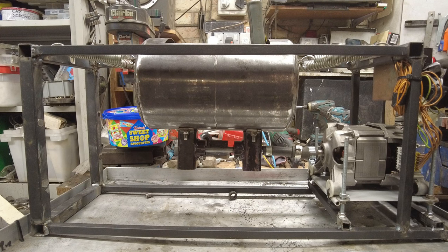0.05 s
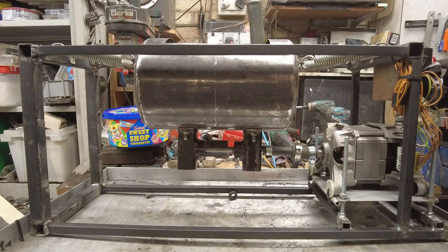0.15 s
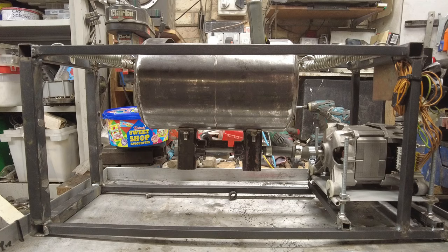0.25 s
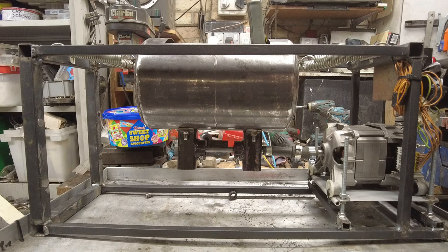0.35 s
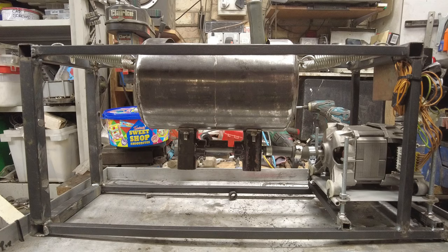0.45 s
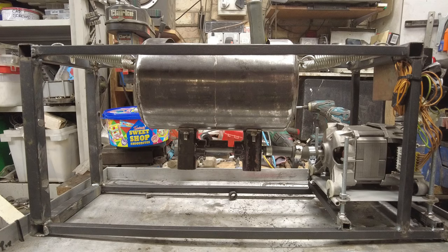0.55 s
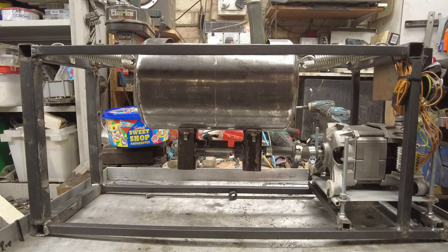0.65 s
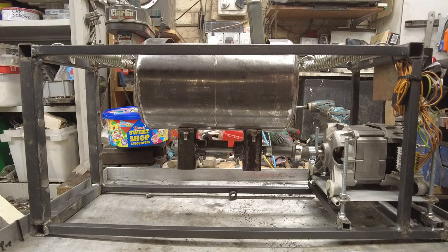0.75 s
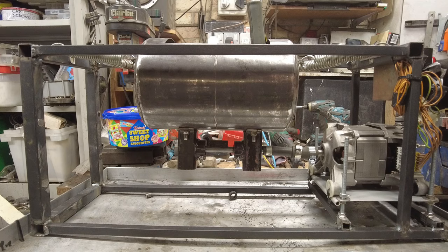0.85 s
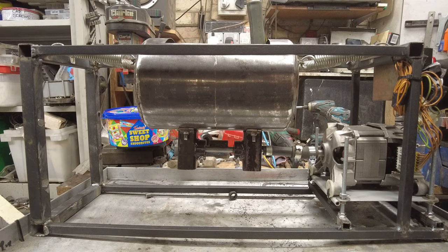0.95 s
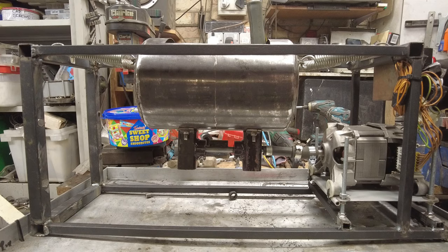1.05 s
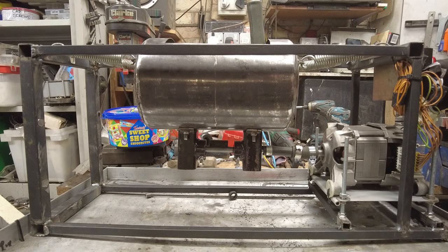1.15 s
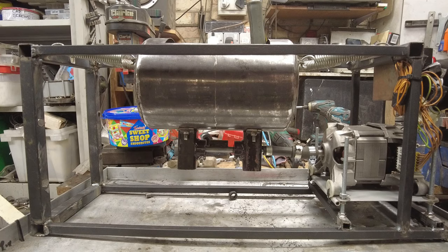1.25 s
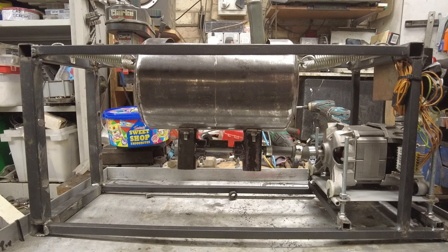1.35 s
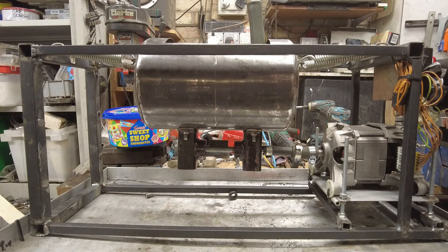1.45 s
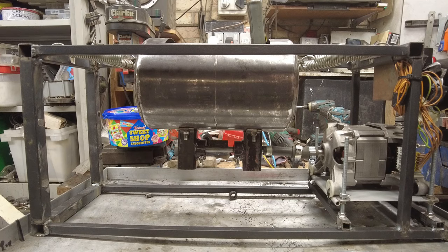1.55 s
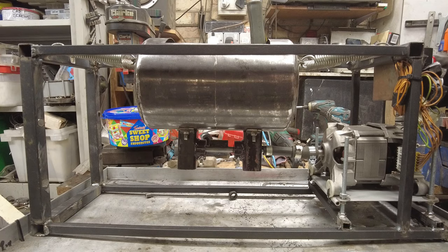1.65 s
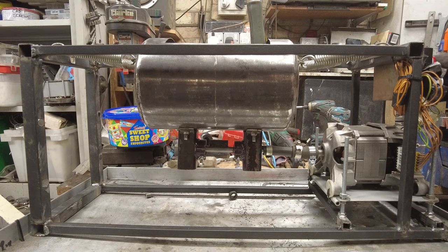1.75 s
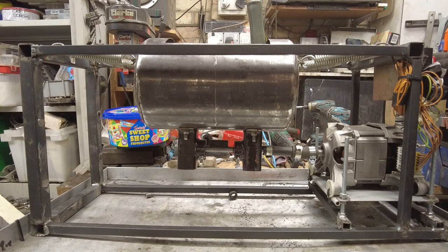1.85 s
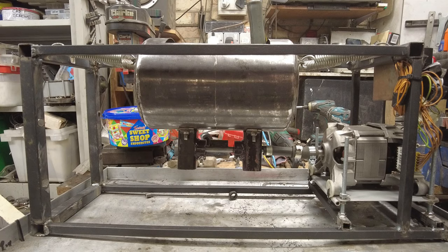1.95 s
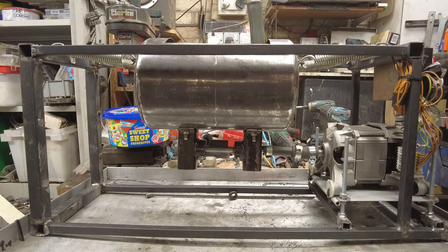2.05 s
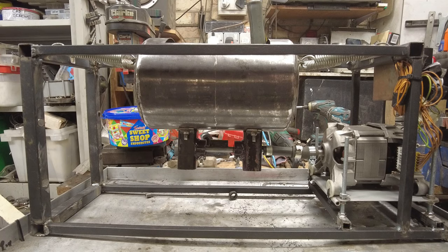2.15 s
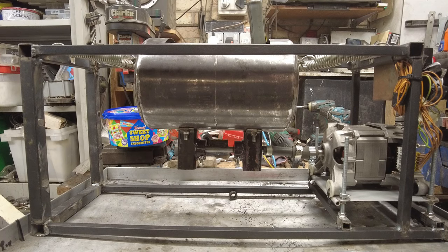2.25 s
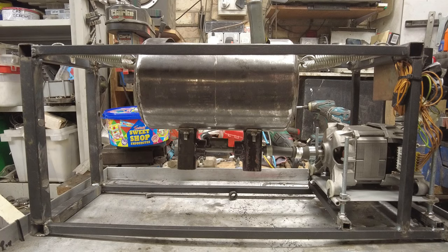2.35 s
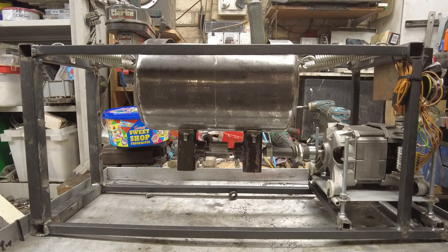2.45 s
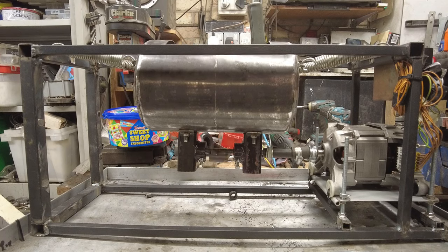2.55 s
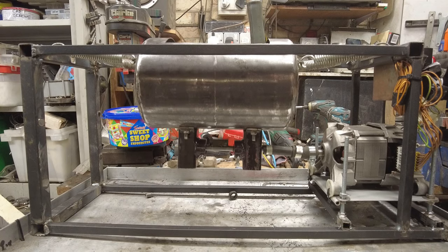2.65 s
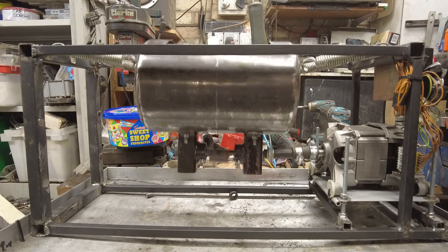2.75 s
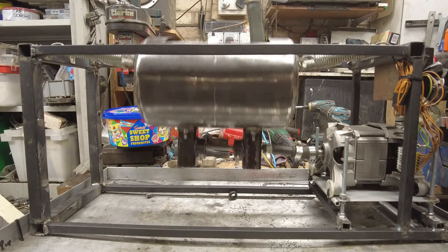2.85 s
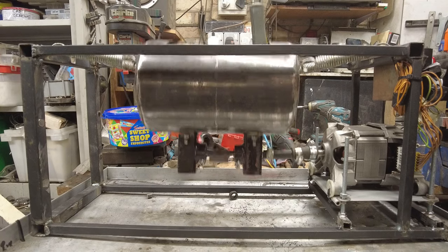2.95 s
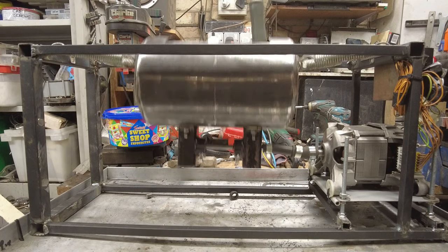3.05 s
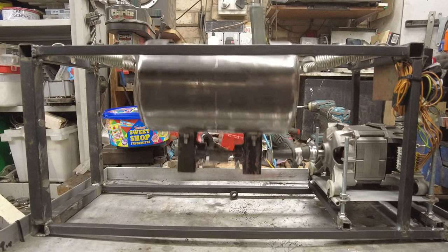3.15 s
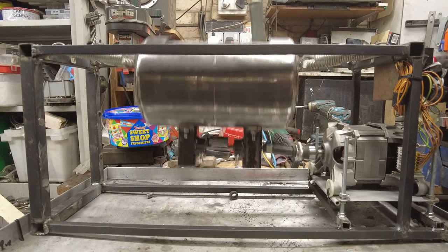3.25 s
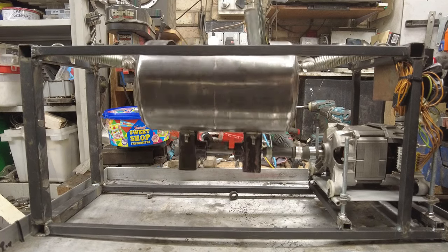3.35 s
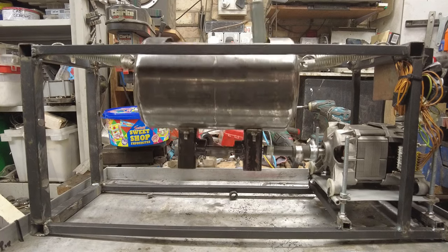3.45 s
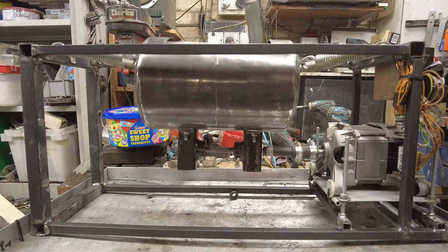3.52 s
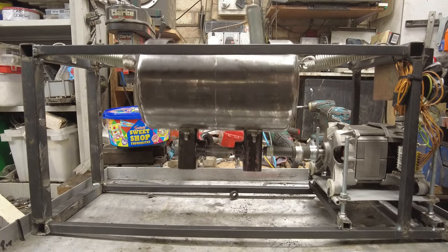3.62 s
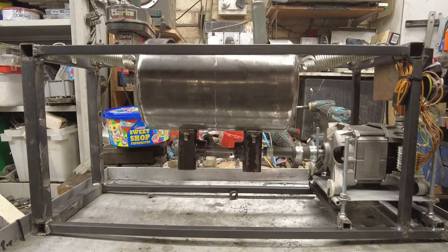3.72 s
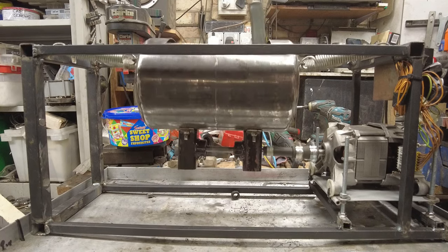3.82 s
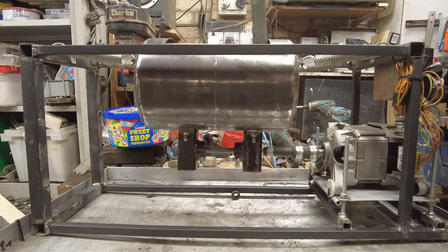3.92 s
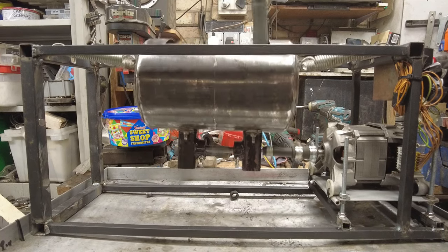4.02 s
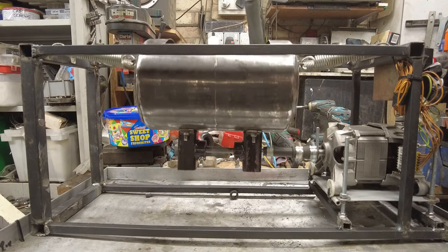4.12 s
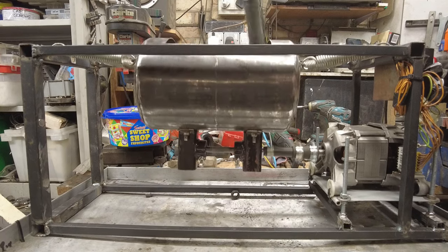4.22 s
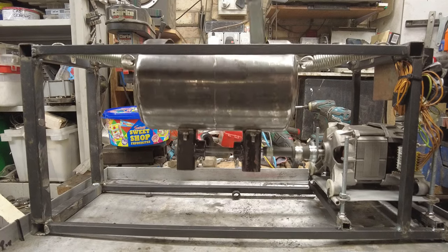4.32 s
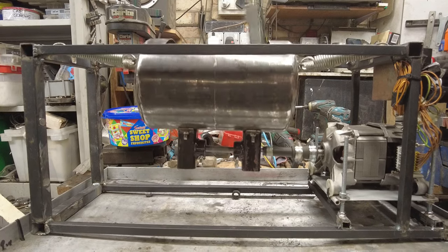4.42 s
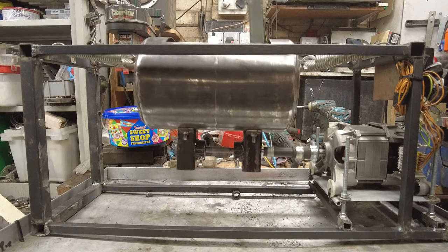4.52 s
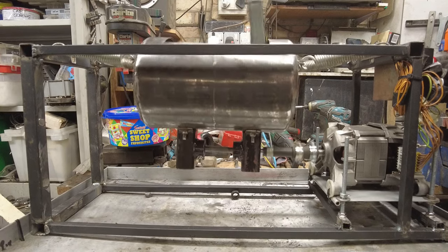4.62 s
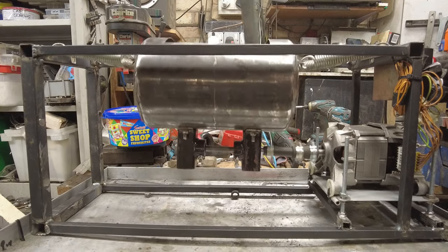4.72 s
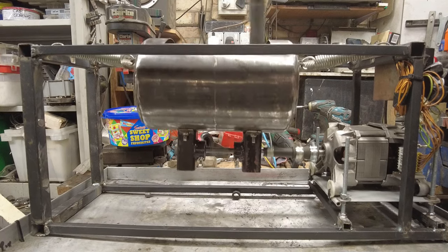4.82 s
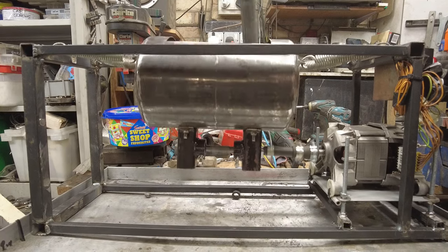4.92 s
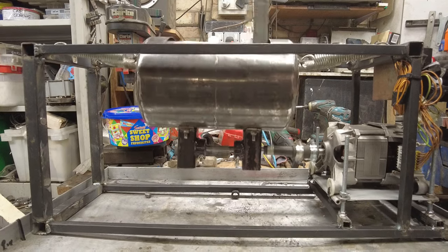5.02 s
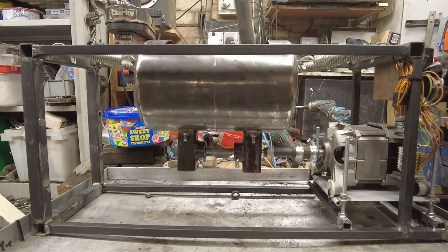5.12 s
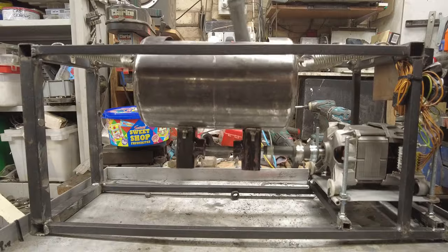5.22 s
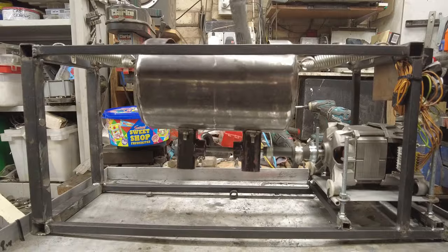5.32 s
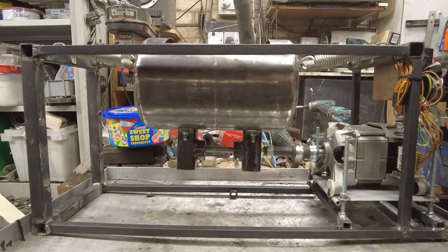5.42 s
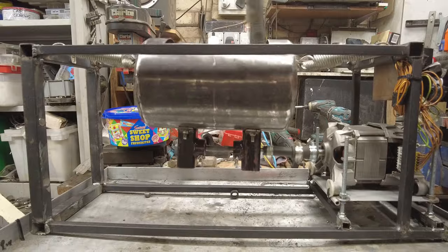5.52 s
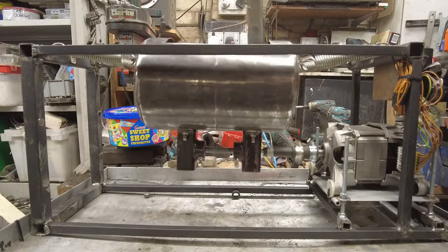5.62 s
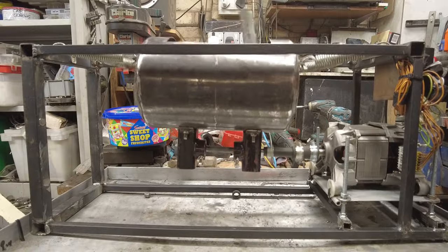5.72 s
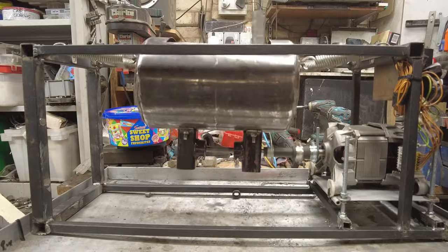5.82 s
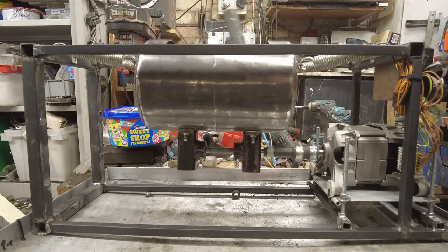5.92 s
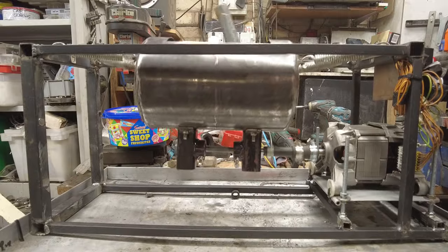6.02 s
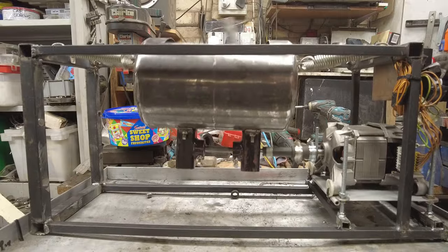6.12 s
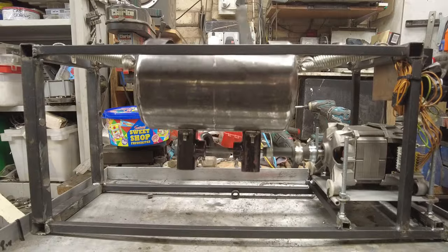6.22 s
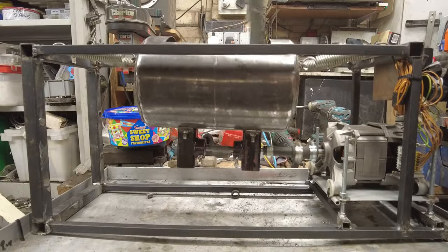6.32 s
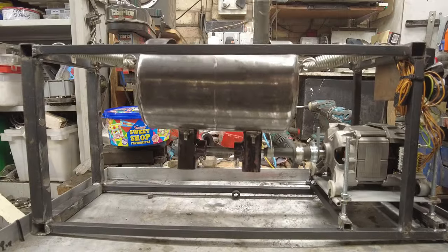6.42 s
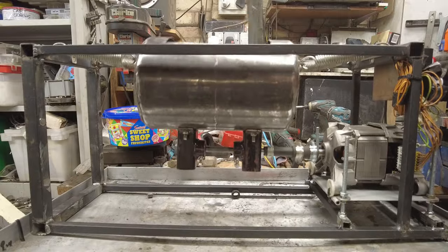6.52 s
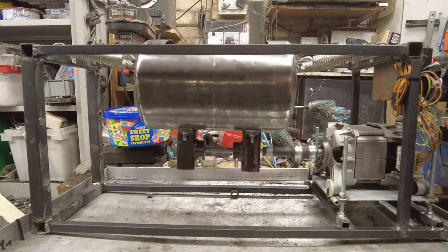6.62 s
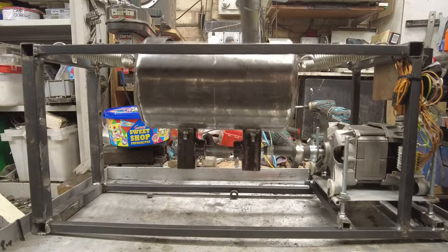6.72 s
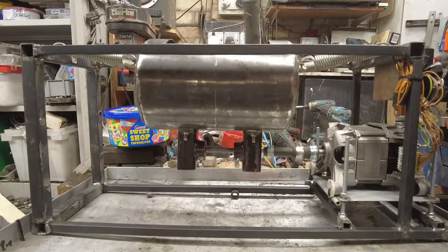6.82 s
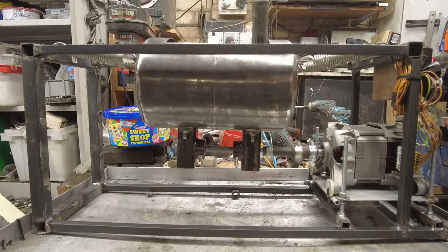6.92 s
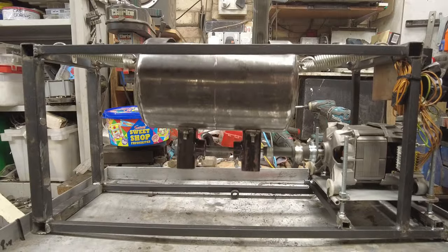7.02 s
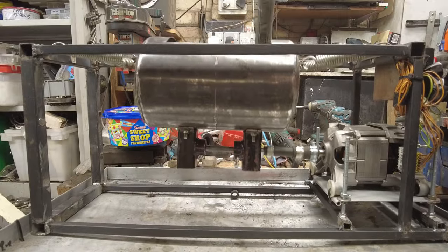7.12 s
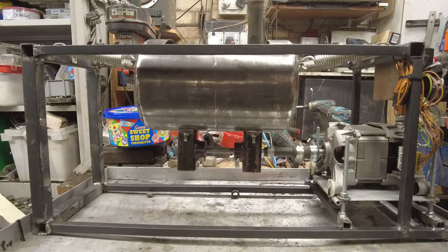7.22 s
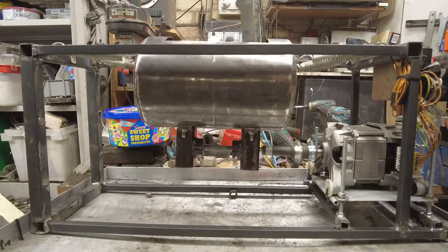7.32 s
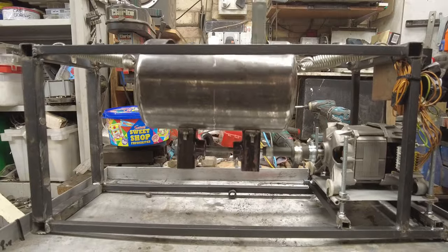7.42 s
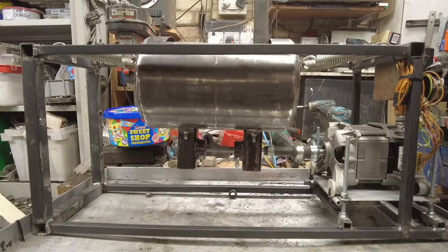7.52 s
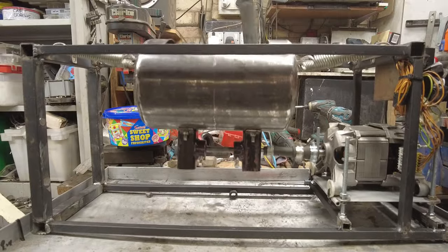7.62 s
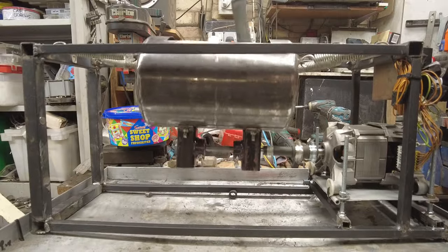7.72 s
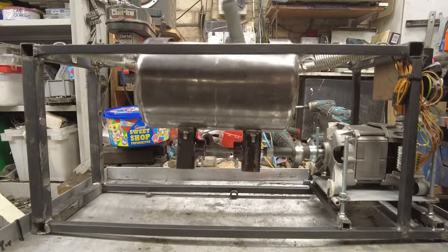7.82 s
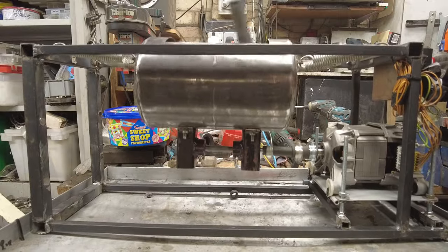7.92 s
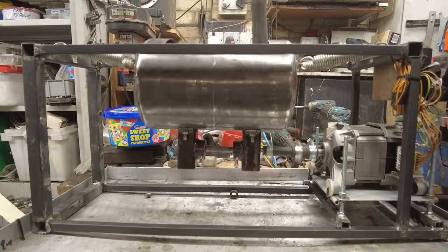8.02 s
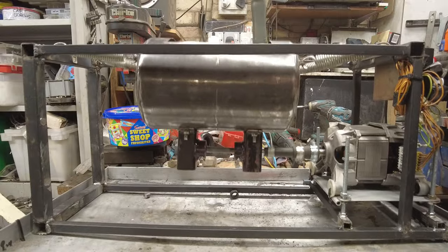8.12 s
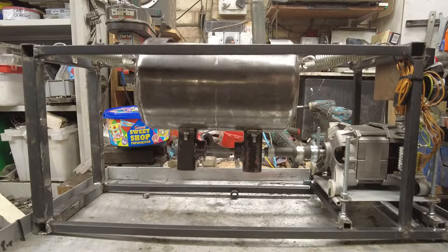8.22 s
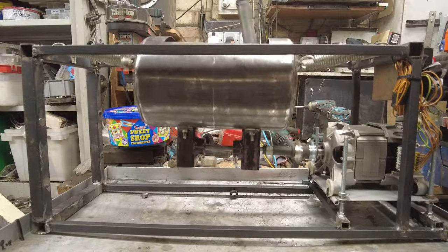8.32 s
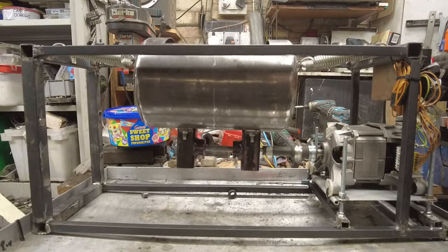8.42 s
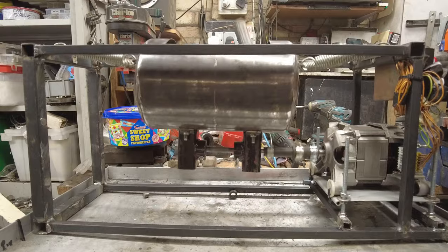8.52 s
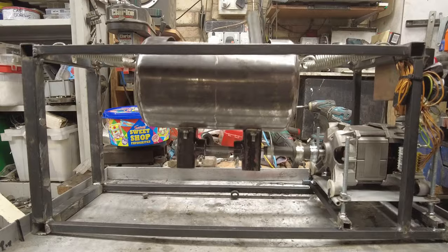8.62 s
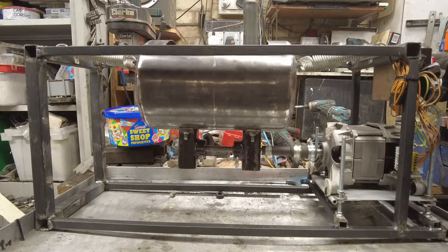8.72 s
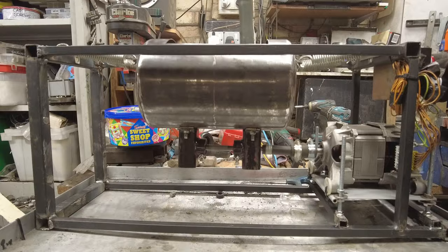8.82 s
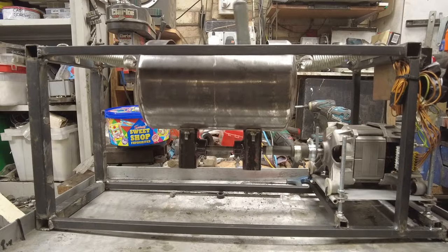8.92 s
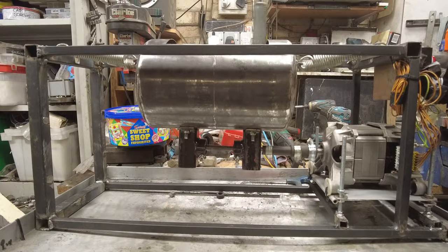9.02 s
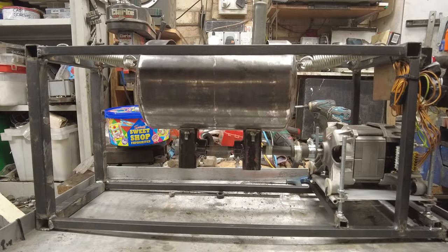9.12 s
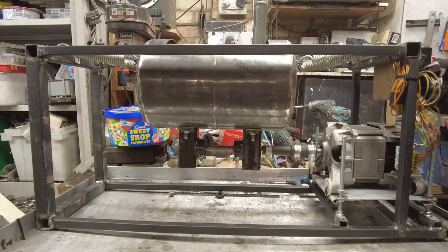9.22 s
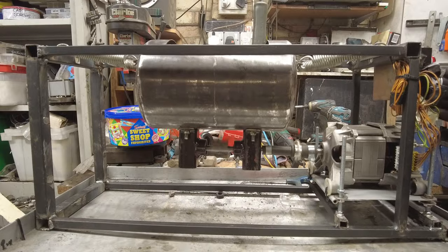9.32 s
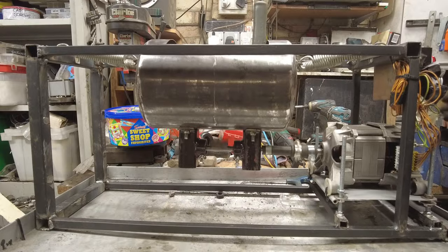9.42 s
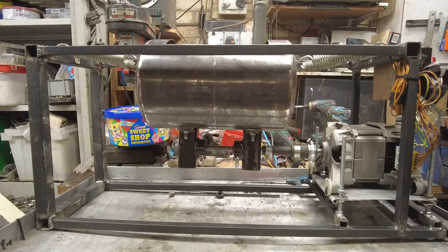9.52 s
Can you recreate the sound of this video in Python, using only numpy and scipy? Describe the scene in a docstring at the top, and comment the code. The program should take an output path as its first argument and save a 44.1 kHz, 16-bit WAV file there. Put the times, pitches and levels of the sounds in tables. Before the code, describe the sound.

A vibrating steel tumbler starts up in a garage. First only low room noise, a click and soft electrical humming; after more clacks the hum stops and heavy metal pieces slam the barrel wall. Rattling stays loud and irregular to the end, pulsing gently about five times a second, with hollow thumps, sharp clinks and a buried low drone. Heard close by in stereo, with short reflections.

```python
"""A vibratory tumbler starts in a garage: a switch clacks and mains-locked tones hum, buzz and whine.
Two more clacks follow as the sprung steel barrel begins to shake; the motor tones end at 2.81 s.
Bolts and hammers then pelt the wall and each other: random contacts ring steel modes, heaps crash,
chips shower in spurts that swell about five times a second, and thumps make the low modes boom.
From 3.8 s a drone (gliding sine) climbs; it drops away near 8.8 s. Noise rumbles beneath it all."""
import sys
import numpy as np
from scipy import signal
from scipy.fft import rfft, irfft
from scipy.io import wavfile
from scipy.ndimage import uniform_filter1d

SR = 44100
rng = np.random.default_rng(int(sys.argv[2]) if len(sys.argv) > 2 else 0)


def put_to_file(sound):
    """Save the sound as 16-bit audio at rate SR, in the file named by the first command-line argument."""
    columns = np.atleast_2d(sound).T  # one column per channel
    safe = np.clip(columns, -1, 1)
    whole_steps = np.round(safe * 32767)
    wavfile.write(sys.argv[1], SR, whole_steps.astype(np.int16))


N = 421596
TIME = np.arange(N) / SR
RING_TIME = TIME[:SR // 2]

# Levels are relative wherever a function normalizes or scales them.
# heaps crashing on the wall: start_s, wall_level_db, clink_level_db, pour_s
HEAP_CRASHES = [(2.606, -51, -83, .017), (2.786, -34, -60, 0.031), (2.834, -27, -55, 0.027),
                (3.04, -5, -32, .023), (3.236, -0.5, -23, 0.023), (3.27, -6.5, -30, 0.014),
                (3.298, -8.5, -35, .018), (3.42, -7.5, -29, 0.042), (3.469, -4, -26.5, 0.023),
                (3.54, -6.5, -34, 0.015), (3.617, -10.5, -40, 0.019), (3.731, -9, -28, 0.011),
                (3.817, -8.5, -30, 0.019), (3.985, -11.5, -41, 0.05), (4.06, -7.5, -36, 0.068),
                (4.27, -12.5, -44, 0.016), (4.378, -1.5, -27.5, 0.0094), (4.447, -7, -29.5, 0.03),
                (4.73, -12, -33.5, .018), (4.831, -7, -35, 0.024), (4.86, -23, -31, 0.0078),
                (5.104, -12, -32.5, 0.046), (5.354, -14.5, -32, 0.027), (5.416, -8, -27.5, 0.023),
                (5.565, -11, -35.5, 0.049), (5.613, -7, -29, 0.025), (5.818, -7.5, -32.5, 0.019),
                (5.895, -2.5, -32, 0.011), (5.953, -3, -40, 0.011), (6.05, -13.5, -30, 0.015),
                (6.201, -17, -47, 0.028), (6.352, -6.5, -31, 0.017), (6.529, -10, -28.5, 0.019),
                (6.602, -16, -29.5, 0.01), (6.679, -26, -31, 0.016), (6.925, -7, -37, 0.035),
                (7.412, -7.5, -33.5, .014), (7.571, -6, -28.5, 0.022), (7.695, -14, -32, 0.022),
                (7.805, -16, -45, 0.02), (7.911, -15, -31.5, .02), (7.966, -9, -37, 0.016),
                (8.314, -4.5, -35, 0.026), (8.359, -3.5, -26, 0.024), (8.549, -6, -30.5, 0.028),
                (8.948, -7, -29.5, 0.033), (9.04, -7, -33.5, 0.052), (9.161, -12.5, -31.5, 0.029),
                (9.333, -13, -36.5, 0.031)]
# drive of the load: time_s, wall_blow_level_db, clink_level_db, chip_level_db, boom_level_db
SHAKE_LEVELS = [(2.4, -74, -76, -82, -67), (2.58, -67, -78, -79, -60), (2.775, -56, -71, -70, -56),
                (2.85, -46.5, -85, -67, -32.5), (3.03, -38, -44, -61, -38.5), (3.22, -40, -64, -72, -39),
                (3.39, -28, -42, -62, -21), (3.48, -24.5, -41, -54, -31), (3.75, -21.5, -34, -47, -19),
                (4.05, -22, -32.5, -37, -17), (4.7, -21, -32, -39, -27), (5.45, -22.5, -33, -41, -20.5),
                (6.2, -22, -31.5, -41.5, -20.5), (6.8, -21, -33.5, -37.5, -20.5), (7.7, -21, -31, -38, -23),
                (8.8, -23.5, -35.5, -39.5, -21), (9.22, -26.5, -38, -56, -25), (9.56, -25, -34, -74, -21.5)]
# modes of the steel wall: pitch_hz, width_hz, level_db, left_right_phase_rad
WALL_MODES = [(749.4, 10, 1.5, 0.62), (796.3, 2.56, 5.5, 0.97), (934, 42, -14.5, 0.68), (932, 21, -4.5, 1),
              (981, 13, -2, 0.87), (987, 11.3, 3, 0.17), (1126, 11, -3, 1.16), (1193, 6, -4.5, 1.2),
              (1232, 48, -11, .2), (1284, 47, -15, .15), (1461, 7.8, -1.5, 0.18), (1525, 14.6, -3.5, 0.21),
              (1635, 7.3, -0.5, .3), (1702, 19, -17, .5), (1730, 8.4, -4, 0.36), (1796, 15.6, -6, 0.45),
              (1895, 45, -8, 0.33), (1960, 26, -17.5, 0.65), (2082, 10, -16, 0.49), (2354, 13, -9, .7),
              (2373, 15.5, -8.5, 0.35), (2554, 13, -13, 0.45), (2990, 41, -12.5, 0.45)]
# dense wall overtones: freq_hz, level_db
WALL_SPECTRUM = [(40, -16), (110, -22), (165, -4.5), (220, -2.5), (420, -7), (520, 1), (640, -2.5),
                 (1000, 2.5), (1350, 1), (1800, 5), (2100, -6), (2500, -3.5), (3500, -8.5), (7000, -33.5)]
# overtones of the loose parts: freq_hz, level_db
PARTS_SPECTRUM = [(1200, -13.5), (2500, 0.5), (3300, -2), (4300, 1), (5000, -3), (5700, -1), (6500, -4.5),
                  (7000, -12.5), (7800, -9), (8600, -14.5), (9500, -11.5), (11500, -18.5), (16000, -20)]
# handfuls of chips flung at the steel: start_s, level_db
CHIP_SHOWERS = [(2.78, -52), (3.383, -31.5), (4.11, -29), (5.85, -28.5), (7.335, -33), (7.695, -28)]
# chips on steel: freq_hz, level_db
CHIP_SPECTRUM = [(4000, -25), (7000, -1), (8000, -0.5), (11000, -6.5), (16000, -5.5)]
# lowest modes of the barrel: pitch_hz, width_hz, level_db
BOOM_MODES = [(287.25, 7.3, 2.5), (308.4, 22.4, 2), (334, 16.2, 0.5), (364.4, 7.9, -11), (396, 12, -13.5)]
# hammers thumping the barrel: peak_s, level_db
HAMMER_THUMPS = [(2.718, -44.5), (2.835, -27.5), (3.055, -8.5), (3.275, -10.5), (3.459, -11), (3.63, -17.5),
                 (4.035, -20), (4.13, -18), (4.2, -25), (4.43, -13), (4.56, -14.5), (4.63, -14.5),
                 (4.77, -14), (4.89, -14), (5.87, -15), (6.08, -17.5), (6.18, -15), (6.43, -17),
                 (7.221, -13), (7.378, -12), (7.529, -15.5), (7.709, -13.5), (7.851, -14), (7.965, -13.5),
                 (8.137, -16), (8.305, -16), (8.57, -14.5), (9.435, -15)]
# drone of the drive: time_s, pitch_hz
DRONE_PITCH = [(3.8, 40), (4.05, 50), (4.25, 63), (4.5, 79), (4.9, 83), (5.5, 83.5), (6.1, 83.5), (6.6, 83),
               (8.8, 81.5)]
# drone of the drive: time_s, level_db
DRONE_LEVEL = [(3.8, -54), (4.05, -33.5), (4.4, -41), (4.9, -37.5), (6.5, -37), (7.3, -35.5), (8.75, -35.5),
               (8.82, -59)]
# straining motor: time_s, hum_level_db, buzz_level_db, whine_level_db
MOTOR_LEVELS = [(1.12, -73, -78, -95), (1.17, -54, -73, -79), (1.48, -50.5, -70, -78),
                (1.56, -51.5, -71, -70.5), (2.2, -51, -71, -72), (2.33, -47.5, -67, -87),
                (2.43, -45, -87, -78), (2.74, -47, -65, -82), (2.81, -58, -81, -85)]
# hum of the iron: pitch_hz, level_db
HUM_LINES = [(100, 3), (150, -22), (200, -8.5), (300, -20), (400, -29)]
# buzz of the laminations: freq_hz, level_db
BUZZ_SPECTRUM = [(450, -10), (1100, -10.5), (1750, -4), (2100, -1), (2400, -3), (2600, -8), (3000, -5),
                 (3330, -2), (3800, -15), (6000, -17)]
# whine of the housing: pitch_hz, level_db
WHINE_LINES = [(1750, -7), (2100, -10), (2250, -8), (2300, 2), (2350, -17), (3350, -6)]
# switch and frame clacks: start_s, knock_level_db, knock_t60_s, mode_pitch_hz, mode_level_db, mode_width_hz
CLACK_EVENTS = [(1.131, -50, 0.34, 543, -57, 5.1), (2.355, -52.5, 0.36, 404, -54, 15),
                (2.609, -53.5, 0.16, 1380, -52, 25)]
# knock of a clack: freq_hz, level_db
CLACK_SPECTRUM = [(250, 0.5), (400, -6), (830, -10), (1200, -15), (2400, -22), (3300, -23), (5000, -32),
                  (15000, -40)]
# room rumble: freq_hz, level_db
RUMBLE_SPECTRUM = [(12, -31), (20, 1), (40, -2.5), (54, -18), (128, -26.5), (409, -35.5), (445, -31),
                   (753, -45), (5530, -48.5), (10200, -55), (15000, -52)]
# frame shuddering on the bench: freq_hz, level_db
SHUDDER_SPECTRUM = [(20, -16), (45, 6.5), (70, -4.0), (160, 1), (260, -7), (1000, -80)]
# frame shuddering on the bench: time_s, level_db
SHUDDER_LEVEL = [(2.3, -93), (2.85, -41), (4.1, -47), (8.7, -43), (9.4, -40.5)]
# stereo width of noise: freq_hz, side_to_mid_db
WIDTH_SPECTRUM = [(60, -17), (300, -15.5), (600, -7.5), (1300, -14), (2200, -5), (4000, -2), (12000, -0.5)]

SWING_HZ, SWING_START_S = 4.85, 2.785
SETTLE_DB, SETTLE_S = -25, 0.048
SHOWER_DECAY_S = 0.018
THUMP_RISE_S, THUMP_FALL_S = 0.017, 0.038
MAINS_HZ = 50
RUMBLE_DB = -60.5
TOP_HZ = 15950


def rattle(spots=7):
    """Parts strike several spots; each rings the same wall modes with its own signs and overtones."""
    bunching = surge(rate_hz=35, depth_db=0.94)
    wall_shake = swell(SHAKE_LEVELS, column=1) * swing(depth_db=0.2) * bunching
    parts_shake = swell(SHAKE_LEVELS, column=2) * bunching
    wall_crash = undb(-8.5) * crash_force(column=1, tail_s=0.0022)
    parts_crash = undb(7.5) * crash_force(column=2, tail_s=0.0029)
    out = 0
    for spot in range(spots):
        steady = contacts(rate_hz=55, scatter_db=1.37)
        heap = contacts(rate_hz=220, scatter_db=2.5)
        modes = energy(sum(rng.choice([-1, 1]) * mode(*row) for row in WALL_MODES))
        overtones = clang(WALL_SPECTRUM, t60_s=0.05, room_db=-2, room_t60_s=0.68)
        wall = undb(-1.0) * modes + undb(-4) * overtones
        clink = clang(PARTS_SPECTRUM, t60_s=0.096, room_db=-9, room_t60_s=0.34)
        parts = clink + undb(-7.0) * bolt()
        wall_blow = undb(14.0) * first_blows(column=1, spot=spot, spots=spots)
        parts_blow = undb(24.5) * first_blows(column=2, spot=spot, spots=spots)
        on_wall = steady * wall_shake + heap * wall_crash + wall_blow
        on_parts = steady * parts_shake + heap * parts_crash + parts_blow
        out = out + ring(on_wall, wall) + ring(on_parts, parts)
    return out / np.sqrt(spots)


def contacts(rate_hz, scatter_db):
    """Random metal-to-metal contacts: impulses of either sign, their sizes scattered in dB."""
    hit = rng.random(N) < rate_hz / SR
    size = undb(scatter_db * np.clip(rng.standard_normal(N), -2, 2))
    return unit(hit * size * rng.choice([-1, 1], N))


def crash_force(column, tail_s):
    """Each heap lands at once, keeps pouring for a moment and settles."""
    force = np.zeros(N)
    for row in HEAP_CRASHES:
        start, pour_s = int(row[0] * SR), max(row[3], 1 / SR)
        overrun = np.maximum(RING_TIME - pour_s, 0)
        pour = np.exp(-.8 * RING_TIME / pour_s - overrun / tail_s)
        settling = undb(SETTLE_DB) * np.exp(-RING_TIME / SETTLE_S)
        pour = np.maximum(pour, settling)
        force[start:start + len(pour)] += undb(row[column]) * pour[:N - start]
    return force


def first_blows(column, spot, spots):
    """The heaviest piece of a heap lands first, a single impulse on one spot of the wall."""
    force = np.zeros(N)
    for row in HEAP_CRASHES[spot::spots]:
        force[int(row[0] * SR)] = undb(row[column]) * np.sqrt(spots)
    return force


def bolt(count=10):
    """A loose part rings with a few sharp modes of its own."""
    draws = rng.random((count, 3))
    pitches_hz = 2000 * (9000 / 2000) ** draws[:, 0]
    out = 0
    for hz, (_, phase_draw, size_draw) in zip(pitches_hz, draws):
        tone = mode(hz, 15, 0, phase_rad=3 * (phase_draw - .5))
        out = out + tone * gain_at(hz, PARTS_SPECTRUM) * (size_draw + 0.17)
    return energy(out)


def jingle(spots=4):
    """Light chips shower on the steel in random short spurts that swell with the swings."""
    tosses = np.abs(contacts(rate_hz=30, scatter_db=8.5))
    spurts = unit(ring(tosses, fade(0.12)[None])[0])
    spurts = unit(undb(-7) + spurts)
    shake = swell(SHAKE_LEVELS, column=3) * spurts * swing(depth_db=2.0)
    for start_s, db in CHIP_SHOWERS:
        start = int(start_s * SR)
        shake[start:start + len(RING_TIME)] += undb(db) * np.exp(-RING_TIME / SHOWER_DECAY_S)
    out = 0
    for _ in range(spots):
        force = contacts(rate_hz=400, scatter_db=2) * shake
        out = out + ring(force, clang(CHIP_SPECTRUM, t60_s=0.03, room_db=-8, room_t60_s=0.19))
    return out / np.sqrt(spots)


def swing(depth_db):
    """Gain that rises and falls as the barrel rocks on its springs, deepening over half a second."""
    since_s = TIME - SWING_START_S
    return undb(depth_db * np.cos(2 * np.pi * SWING_HZ * since_s) * np.clip(2 * since_s, 0, 1))


def surge(rate_hz, depth_db):
    """Gain that wanders as the load bunches up and loosens."""
    steps = rng.standard_normal(1024)
    return undb(depth_db * np.interp(TIME * rate_hz, np.arange(len(steps)), steps))


def boom(hold_s):
    """The load's weight drives the barrel's close low modes, which beat against each other."""
    shell = sum((-1) ** k * mode(*row, phase_rad=0.15) for k, row in enumerate(BOOM_MODES))
    band = signal.butter(2, [255, 420], "band", fs=SR, output="sos")
    tone = unit(ring(contacts(rate_hz=600, scatter_db=1.5), signal.sosfilt(band, shell)))
    # level the tone so that heave() sets its strength
    power = uniform_filter1d(np.mean(tone ** 2, axis=0), int(hold_s * SR))
    return tone / np.sqrt(power + 1e-6) * heave()


def heave():
    """How widely the wall swings: uneven steady shaking, and a quick swell for each hammer thump."""
    power = (swell(SHAKE_LEVELS, column=4) * surge(rate_hz=26, depth_db=1.96)) ** 2
    for peak_s, db in HAMMER_THUMPS:
        near = slice(int((peak_s - .1) * SR), int((peak_s + .3) * SR))
        since_s = TIME[near] - peak_s
        thump = np.exp(-np.maximum(-since_s / THUMP_RISE_S, since_s / THUMP_FALL_S))
        power[near] += (undb(db) * thump) ** 2
    return np.sqrt(power)


def drone():
    """The drive's pure tone: a sine whose pitch climbs and settles."""
    phase_rad = 2 * np.pi * np.cumsum(curve(DRONE_PITCH)) / SR
    return np.sqrt(2) * np.sin(phase_rad) * swell(DRONE_LEVEL)


def motor():
    """Iron hums mainly at twice the mains rate; laminations buzz on harmonics, the housing whines."""
    harmonics_hz = np.arange(450, 5000, 50)
    laminations = zip(harmonics_hz, 20 * np.log10(gain_at(harmonics_hz, BUZZ_SPECTRUM)))
    hiss = noise(list(BUZZ_SPECTRUM) + [(15000, -44)], size=N)
    buzz = mains_lines(laminations, waver_db=2.5) + undb(-3) * hiss
    hum = mains_lines(HUM_LINES, waver_db=.4) * swell(MOTOR_LEVELS, column=1)
    whine = mains_lines(WHINE_LINES, waver_db=1.2) * swell(MOTOR_LEVELS, column=3)
    return hum + buzz * swell(MOTOR_LEVELS, column=2) + whine


def mains_lines(lines, waver_db):
    """Tones locked to multiples of the mains rate, each wavering in strength, up to the motor's end."""
    t = TIME[:int(MOTOR_LEVELS[-1][0] * SR)]
    knots = np.linspace(0, t[-1], num=24)
    out = 0
    for hz, db in lines:
        waver = np.interp(t, knots, undb(db + waver_db * rng.standard_normal(len(knots))))
        locked_hz = MAINS_HZ * round(hz / MAINS_HZ)
        out = out + waver * np.sin(2 * np.pi * (locked_hz * t + rng.random()))
    return np.pad(unit(out), (0, N - len(t)))


def clacks():
    """The switch closes and the frame takes up the load: a noise knock and a short ring each."""
    out = np.zeros((2, N))
    for start_s, db, t60_s, hz, ring_db, width_hz in CLACK_EVENTS:
        start = int(start_s * SR)
        knock = undb(db) * noise(CLACK_SPECTRUM, size=len(RING_TIME)) * fade(t60_s)
        out[:, start:start + len(RING_TIME)] += knock + mode(hz, width_hz, ring_db) / width_hz
    return out


def rumble():
    """Quiet room rumble, and the frame shuddering on the bench once the barrel moves."""
    shudder = noise(SHUDDER_SPECTRUM, size=N) * swell(SHUDDER_LEVEL)
    return undb(RUMBLE_DB) * noise(RUMBLE_SPECTRUM, size=N) + shudder


def mode(hz, width_hz, db, phase_rad=0):
    """A decaying sine, its phase split between left and right; the width sets decay and strength."""
    angle = 2 * np.pi * hz * RING_TIME + np.array([[phase_rad], [-phase_rad]]) / 2
    return undb(db) * width_hz * np.exp(-np.pi * width_hz * RING_TIME) * np.sin(angle)


def clang(points, t60_s, room_db, room_t60_s):
    """Countless overtones as decaying noise, with the garage's echo dying more slowly."""
    direct = energy(noise(points, size=len(RING_TIME)) * fade(t60_s))
    echo = energy(noise(points, size=len(RING_TIME)) * fade(room_t60_s))
    return energy(direct + undb(room_db) * echo)


def ring(force, response):
    """Drive a response with a force by convolution."""
    return signal.oaconvolve(np.atleast_2d(force), response, axes=1)[:, :N]


def noise(points, size):
    """Coloured stereo noise of rms 1, its width set per frequency."""
    hz = np.arange(size // 2 + 1) * SR / size
    mid, side = rfft(rng.standard_normal((2, size)))
    side = gain_at(hz, WIDTH_SPECTRUM) * side
    stereo = mid + np.array([[1], [-1]]) * side
    return unit(irfft(stereo * gain_at(hz, points), size))


def fade(t60_s):
    """Exponential decay by 60 dB in t60_s."""
    return np.exp(-np.log(1000) * RING_TIME / max(t60_s, 1 / SR))


def undb(db):
    """Decibels to gain."""
    return 10 ** (np.asarray(db) / 20)


def curve(rows, column=1):
    """One table column, joined by straight lines in time."""
    rows = np.array(rows)
    return np.interp(TIME, rows[:, 0], rows[:, column])


def swell(rows, column=1):
    """Gain from a dB column, silent before its first row."""
    return undb(curve(rows, column)) * (TIME > rows[0][0])


def gain_at(hz, points):
    """Gain of a (freq_hz, level_db) spectrum, interpolated on log frequency."""
    f, db = np.transpose(points)
    return undb(np.interp(np.log(hz + 1), np.log(f), db))


def unit(x):
    """Scale to rms 1."""
    return x / np.sqrt(np.mean(x ** 2))


def energy(response):
    """Scale a response so that it passes white noise at the same level."""
    return unit(response) / np.sqrt(response.shape[-1])


def scene():
    """The whole machine in its garage, a touch to the left."""
    lean = undb(np.array([[.3], [-.3]]) / 2)
    return lean * (rattle() + jingle() + boom(hold_s=0.049) + drone() + motor() + clacks() + rumble())


def record(dry):
    """The recorder rounds the highest peaks and cuts the top."""
    rounded = dry / (1 + dry ** 4) ** (1 / 4)
    return signal.sosfilt(signal.ellip(10, .1, 80, TOP_HZ, fs=SR, output="sos"), rounded)


dry = scene()
out = record(dry)
put_to_file(out)
```